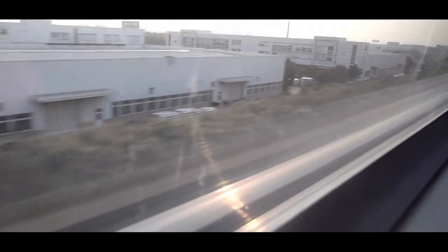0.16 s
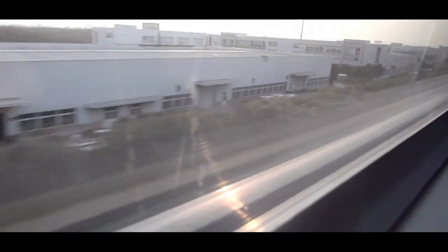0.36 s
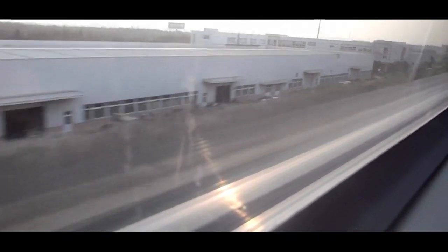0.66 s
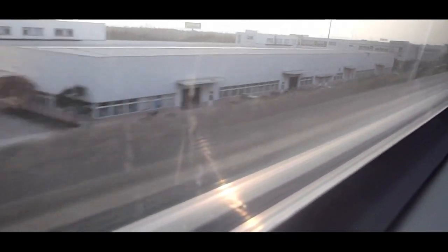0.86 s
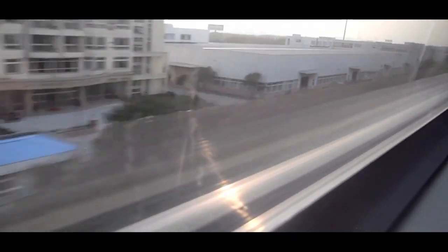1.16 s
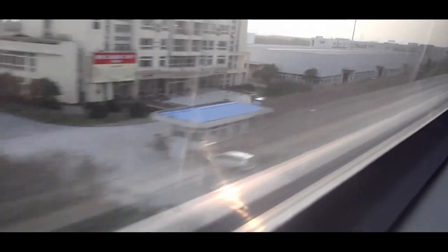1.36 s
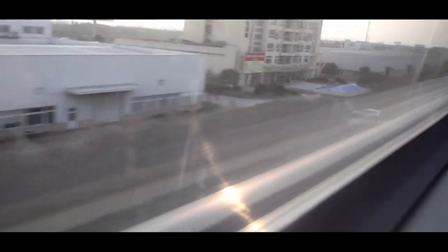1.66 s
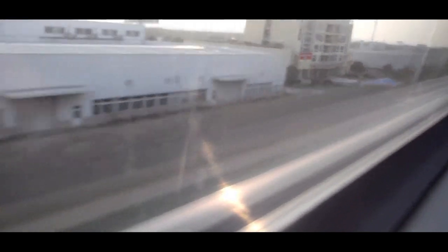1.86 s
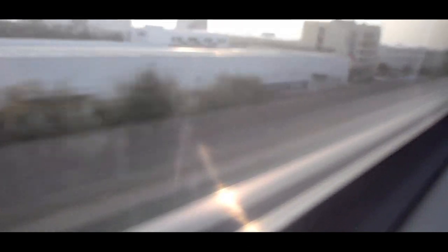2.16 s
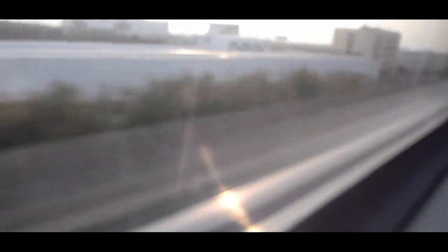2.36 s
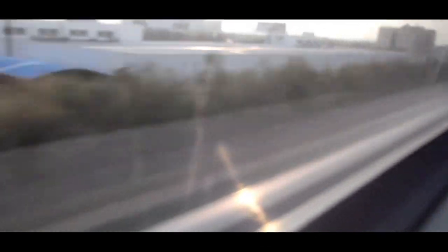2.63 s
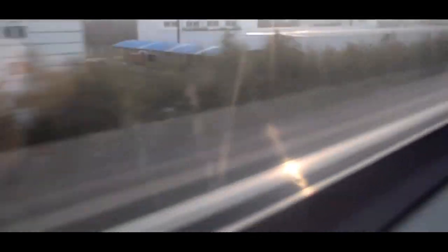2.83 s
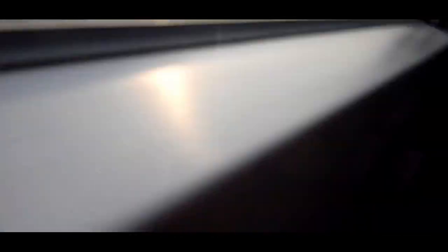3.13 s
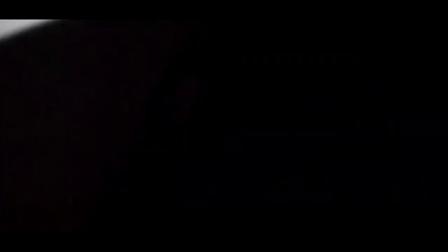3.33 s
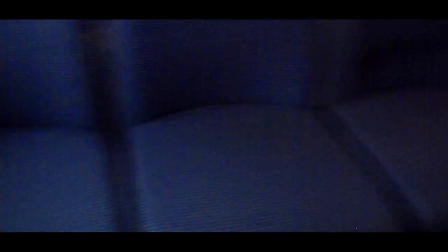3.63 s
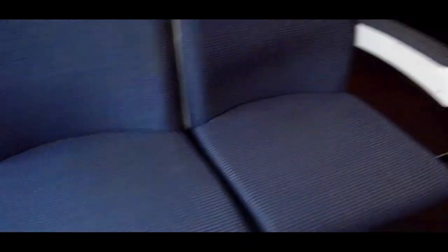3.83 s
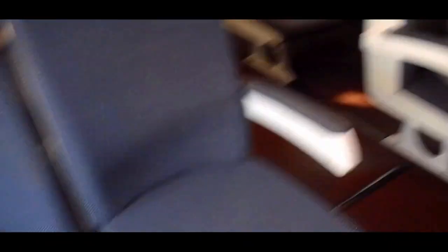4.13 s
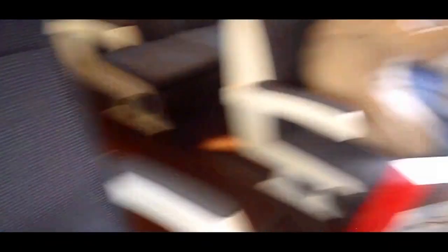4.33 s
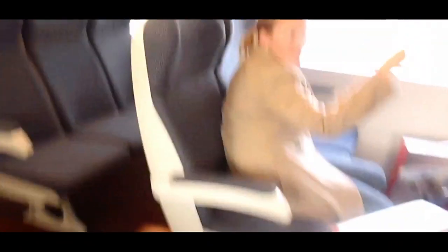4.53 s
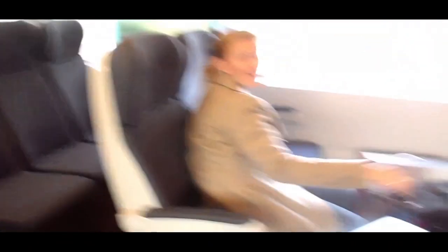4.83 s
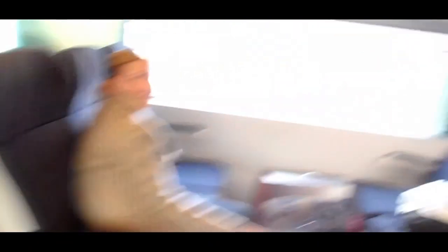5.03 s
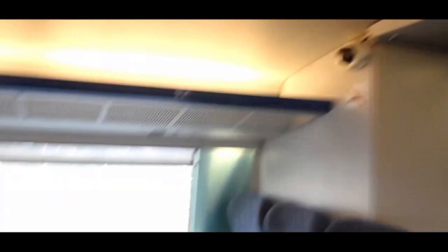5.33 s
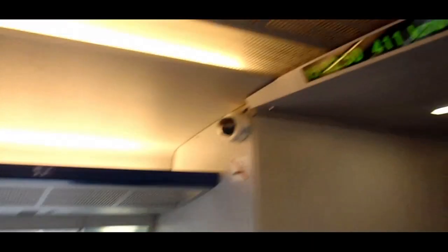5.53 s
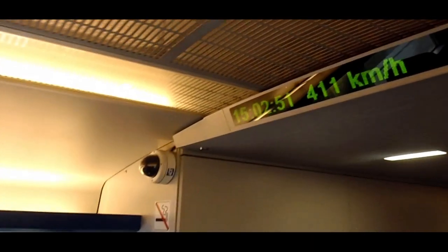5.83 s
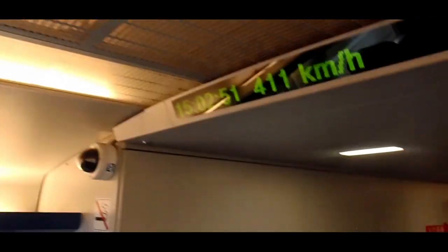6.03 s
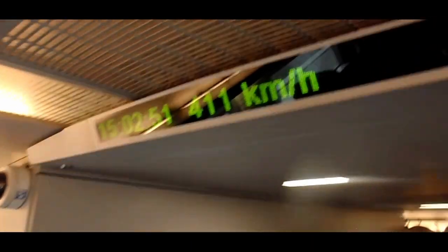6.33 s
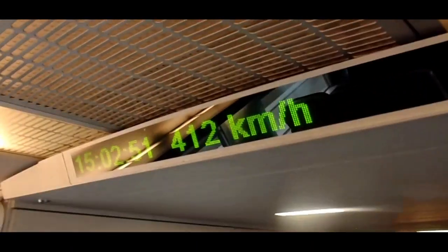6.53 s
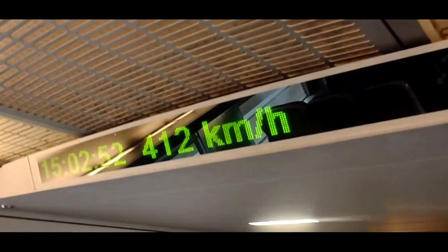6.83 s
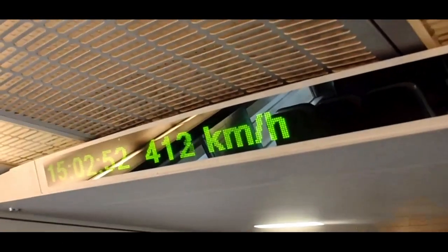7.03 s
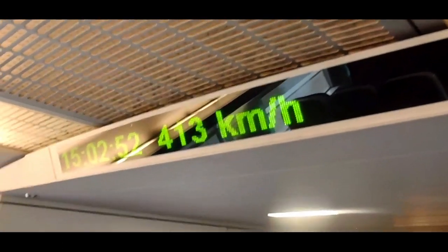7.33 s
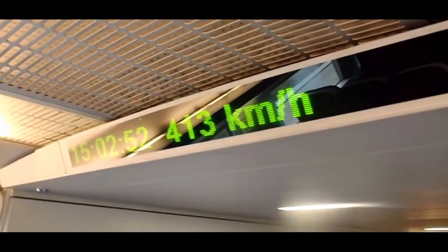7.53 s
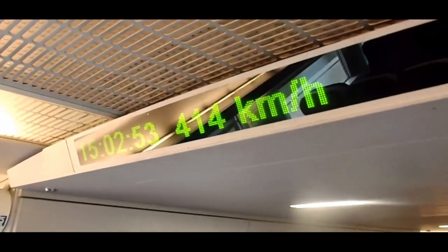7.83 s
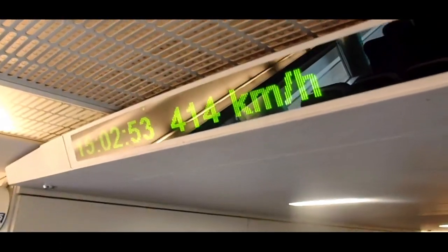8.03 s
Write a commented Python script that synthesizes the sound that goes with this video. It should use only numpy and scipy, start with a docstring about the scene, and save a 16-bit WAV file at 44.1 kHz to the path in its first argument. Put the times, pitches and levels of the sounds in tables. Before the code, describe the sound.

Steady deep rushing roar inside a very fast train cabin, with a rough high whine growing stronger and small plastic ticks of a handheld camera.

```python
"""Air rushing over a maglev train at full speed booms in the cabin and hisses through the panels.
A hand-held camera hears it, turning from the window to the aisle: shaped noise that shifts in colour.
The drive adds low hums and a whine that grows unevenly: wavering tones and a rough band of noise.
The camera's case rustles (grainy noise) and ticks (short rings and cracks) in the hand.
Thin whistles, nearly pure tones, come and go."""
import sys
import numpy as np
from scipy import signal
from scipy.fft import rfft, irfft
from scipy.io import wavfile
from scipy.ndimage import uniform_filter1d

SR = 44100
rng = np.random.default_rng(int(sys.argv[2]) if len(sys.argv) > 2 else 0)


def to_wav(s):
    """Save 16-bit WAV."""
    ch = np.atleast_2d(s).T  # columns
    pcm = np.round(np.clip(ch, -1, 1) * 32767)  # PCM
    wavfile.write(sys.argv[1], SR, pcm.astype(np.int16))


N = 360738
TIME = np.arange(N) / SR
FREQ = np.maximum(np.arange(N // 2 + 1) * SR / N, 1)  # never 0, so its logarithm exists

# where the microphone is: time_s, place (0 at the window, 1 over the seats, 2 in the aisle)
MIC_PLACE = [(0, 0), (3.1, 0), (3.9, 1), (5.4, 1), (6.1, 2), (8.18, 2)]
# level of the rush at the window, over the seats and in the aisle: level_db
PLACE_LEVELS = [-18, -18.5, -19]
# colour of the rumble at each place, relative: pitch_hz, window_db, seats_db, aisle_db
RUMBLE_COLOUR = [(15, -21, -14.5, -21.5), (33.8, -9.5, -10.5, -16.5), (56, 1.5, -1, -8), (91, -1.5, -2, 1),
                 (114.6, -1.5, -0.5, -4.5), (151, -10, -8.5, -7.5), (166, -3.5, -5.5, -10.5),
                 (226, -8.5, -9, -10.5), (257, -9.5, -7, -9), (332, -15, -13.5, -16.5),
                 (455, -19.5, -20, -22.5), (838, -32.5, -32, -33)]
# colour of the air noise above it, on the same scale: pitch_hz, window_db, seats_db, aisle_db
AIR_COLOUR = [(945, -33, -31.5, -32), (1380, -41.5, -36.5, -40), (1430, -43, -39.5, -39.5),
              (1940, -48, -42, -45), (2430, -50.5, -51.5, -53), (3130, -49.5, -46.5, -46.5),
              (3690, -49, -44.5, -44.5), (3985, -55.5, -51, -50.5), (5220, -74.5, -71, -69.5),
              (5440, -70, -64.5, -63.5), (6940, -79.5, -75.5, -79), (13400, -101, -99.5, -102)]
# boost or dip from panel and cabin resonances: pitch_hz, width_hz, window_db, seats_db, aisle_db
PANEL_RESONANCES = [(660, 48, 2, 2.5, 4.5), (1360, 36, -0.5, 1, 6.5), (2380, 320, -1.5, 5, 7.5),
                    (2746, 280, 8, 3.5, 2)]
# brief swells and lulls of the rush: middle_s, length_s, boom_change_db, roar_change_db, hiss_change_db
RUSH_SWELLS = [(1.118, .27, .5, 3, 3), (1.906, 0.18, 3, 1, 2), (2.382, .12, -2, 5, 3.5),
               (2.692, 0.22, 2.5, -0.5, 1.5), (2.862, .08, -0.5, -7.5, -2.5), (3.128, 0.18, 0.5, -11, -5.5),
               (3.33, 0.27, 2, -1, 0), (3.524, 0.2, -2.5, -5.5, -4.5), (3.851, 0.053, 7, 4, -0.5),
               (4.15, 0.21, 0.5, 0, -1), (4.52, .2, -2, 2.5, -0.5), (4.85, 0.084, -1.5, -2, -2.5),
               (5.266, 0.1, -1.5, -4.5, 0.5), (5.763, 0.38, 2.5, 4, 3.5), (5.964, 0.41, -2.5, -4, -3.5),
               (6.207, 0.14, -3.5, 4, 2), (6.401, .08, 2.5, 6.5, 4.5), (7.147, .3, 2, 0, 0),
               (7.485, 0.068, -1.5, -8.5, -4.5), (7.776, .2, 1.5, 1.5, 0), (7.993, 0.44, -2, 0, -1.5)]
# pitch of the drive's whine: time_s, pitch_hz
WHINE_PITCHES = [(0, 1067), (2.4, 1062), (3.1, 1064), (3.45, 1077), (4.1, 1082), (4.7, 1078), (5.65, 1092),
                 (6.5, 1084), (8.18, 1093)]
# levels of the drive's whine: time_s, clean_line_db, rough_band_db
WHINE_LEVELS = [(0, -51, -54), (.75, -50, -45), (1, -49, -49.5), (1.25, -45.5, -49), (1.75, -53.5, -58),
                (2.35, -49.5, -50), (2.85, -50.5, -59.5), (3.12, -56, -61), (3.44, -43.5, -49.5),
                (3.53, -64, -60), (3.64, -51, -36.5), (3.8, -54, -56), (4.07, -39.5, -40.5),
                (4.35, -48.5, -47), (4.6, -44, -43.5), (5.2, -51.5, -44.5), (5.6, -45.5, -43.5),
                (5.85, -39.5, -37.5), (6, -43, -38.5), (6.45, -36, -36.5), (7.33, -39.5, -36),
                (7.5, -41, -41), (7.7, -40, -36), (8.18, -38.5, -39.5)]
# shape of the rough band around the whine's pitch: offset_from_pitch_hz, relative_level_db
ROUGH_BAND = [(-29.5, -40), (-15, -13.5), (2.5, -5.5), (13.5, -1), (26, 0), (47, -8.5), (67.5, -21.5),
              (121, -17), (220, -43.5)]
# low hums inside the rumble: pitch_hz, level_db
LOW_HUMS = [(32, -45.5), (110, -31.5)]
# fingers sliding on the case: middle_s, length_s, level_db
FINGER_RUBS = [(.172, .02, -69), (2.425, .05, -70.5), (2.59, .015, -67), (2.71, .04, -72),
               (3.005, .05, -67), (3.315, .015, -69), (3.66, .05, -66), (3.994, 0.54, -76.5),
               (4.255, 0.029, -69), (4.352, .04, -60), (4.677, .06, -68), (5.2, .02, -65),
               (5.33, 0.11, -71), (5.552, .47, -76), (5.447, 0.026, -62), (5.538, 0.033, -64),
               (6.21, .025, -69)]
# colour of a scuff: pitch_hz, relative_level_db
SCUFF_COLOUR = [(1000, -9.5), (3500, 2), (5500, 2.5), (7300, -3), (8700, -13), (11300, -11), (14500, -22.5)]
# ticks of the case: start_s, knock_db, clack_db, snap_db, crack_db, spot_ring_hz, spot_ring_db
CASE_TICKS = [(.1851, -52, -54, -62, -69, 5500, -70), (2.4425, -42, -51, -54, -66, 3500, -59),
              (2.4462, -31.5, -35.5, -44, -55, 2350, -45), (2.5025, -47, -54, -58, -65, 4000, -62),
              (2.6535, -39, -39, -40.5, -48, 1600, -35.5), (2.813, -29.5, -37, -44, -59, 1400, -40),
              (2.8311, -35, -40, -44, -54.5, 1750, -48), (2.9832, -29.5, -37, -34.5, -41, 4950, -41),
              (3.4973, -34, -37.5, -43, -50, 3750, -47), (3.654, -37.5, -49, -37, -55, 5400, -49),
              (3.6594, -49, -37, -47, -46, 2750, -41), (3.8655, -51, -52, -61, -65, 6500, -68),
              (4.241, -34, -49, -56, -58, 5600, -57), (4.2552, -30, -38, -49, -53.5, 3550, -53),
              (4.305, -50, -56, -64, -66, 9500, -74), (4.3092, -52, -57, -63, -63, 9500, -75),
              (4.5642, -37.5, -37, -51, -62, 1800, -41), (5.3708, -52, -51, -58, -66, 4900, -62),
              (5.4424, -38, -43, -47, -55, 3600, -52), (5.8394, -33.5, -25, -37.5, -45.5, 5750, -50),
              (6.2065, -45, -54, -62, -67, 6500, -71), (6.5588, -50, -46.5, -62, -64, 5500, -68)]
# what the case rings with, relative: pitch_hz, level_db, time_to_fall_60_db_s
CASE_RINGS = [(690, 18.5, 0.016), (900, -3, 0.044), (1170, -5.5, 0.015), (1510, -2, 0.018),
              (2150, 5, 0.0064), (2780, -3.5, 0.017), (3500, 3.5, 0.011), (4050, -2.5, 0.02),
              (4640, -3.5, 0.009), (5500, -2.5, 0.0076), (5830, -6, 0.007), (7340, -5, 0.0088)]
# parts of a tick: knock, clack, snap, crack and the fizz above: lower_edge_hz, upper_edge_hz
TICK_REGISTERS = [(550, 710), (1000, 2300), (2300, 4100), (4200, 5500), (6500, 10000)]
# thin whistles that come and go; those near 1330 Hz are a faint second line of the drive: middle_s, length_s,
# pitch_hz, level_db
THIN_WHISTLES = [(3.47, .35, 1324, -58), (4.8, .9, 1328, -58), (5.7, .3, 1332, -51.5),
                 (7.0, 1.2, 3596, -70), (7.46, .2, 4102, -64)]

BOOM_TOP_HZ, ROAR_TOP_HZ = 219, 1200  # where the boom gives way to the roar, and the roar to the hiss
TOP_HZ = 15700  # highest pitch let through at the end


def undb(db):
    """Turn decibels into gain."""
    return 10 ** (np.asarray(db) / 20)


def unit(x):
    """Scale to rms 1."""
    return x / np.sqrt(np.mean(x ** 2))


def curves(table):
    """Join each column of a table by straight lines in time."""
    times, *columns = np.transpose(table)
    return [np.interp(TIME, times, column) for column in columns]


def shaped_noise(gain):
    """Make random noise with the given gain at every frequency."""
    return irfft(rfft(rng.standard_normal(N)) * gain, N)


def walk(rate):
    """Wander smoothly by chance, with spread 1, changing about rate times a second."""
    return unit(shaped_noise(np.exp(-(FREQ / rate) ** 2)))


def colour(points):
    """Turn points of pitch and decibels into a gain at every frequency."""
    hz, db = np.transpose(points)
    return undb(np.interp(np.log(FREQ), np.log(hz), db))


def hump(middle, length):
    """Rise and fall smoothly around a moment, 1 at the top; length is the width at 37 % height."""
    return np.exp(-(2 * (TIME - middle) / length) ** 2)


def steady(x):
    """Hold a beating tone at about rms 1 over every quarter second."""
    return x / np.sqrt(uniform_filter1d(x ** 2, size=SR // 4))


def cabin_noise(index):
    """Turbulent air is noise, coloured by the cabin and its panels at one place; rms 1."""
    gain = colour([(row[0], row[1 + index]) for row in RUMBLE_COLOUR + AIR_COLOUR])
    for hz, width, *db in PANEL_RESONANCES:
        resonance_db = db[index] / (1 + (2 * (FREQ - hz) / width) ** 2)
        gain = gain * undb(resonance_db)
    return unit(shaped_noise(gain))


def swells():
    """The boom, the roar and the hiss each swell or sink at times; changes in dB."""
    return sum(np.outer(db, hump(middle, length)) for middle, length, *db in RUSH_SWELLS)


def rush(buffet_db=0.88, flicker_db=1.2, surge_db=0.18):
    """Rushing air changes colour with place; eddies shake all of it together and each register alone."""
    place, = curves(MIC_PLACE)
    air = 0
    for index in range(3):
        share = np.clip(1 - abs(place - index), 0, 1)
        # square roots keep the power even while two places blend
        air = air + np.sqrt(share) * undb(PLACE_LEVELS[index]) * cabin_noise(index)
    spectrum = rfft(air)

    below_roar = 1 / (1 + (FREQ / BOOM_TOP_HZ) ** 4)
    below_hiss = 1 / (1 + (FREQ / ROAR_TOP_HZ) ** 4)
    boom_roar_hiss = below_roar, below_hiss - below_roar, 1 - below_hiss
    shared_eddies_db = buffet_db * walk(16) + surge_db * walk(2.3)
    out = 0
    for register, swell_db in zip(boom_roar_hiss, swells()):
        change_db = swell_db + shared_eddies_db + flicker_db * walk(35)
        out = out + irfft(spectrum * register, N) * undb(change_db)
    return out


def whine(wander_hz=2.5, flutter_db=4.0):
    """The drive's wavering line beats against a rough band of near tones, strongest just above it."""
    line_db, band_db = curves(WHINE_LEVELS)
    pitch_hz, = curves(WHINE_PITCHES)
    carrier = np.exp(2j * np.pi * np.cumsum(pitch_hz + wander_hz * walk(14.1)) / SR)
    line = steady(carrier.imag * undb(flutter_db * walk(25)))

    offset_hz, offset_db = np.transpose(ROUGH_BAND)
    gain = np.interp(np.fft.fftfreq(N, 1 / SR), offset_hz, undb(offset_db), left=0, right=0)
    roughness = np.fft.ifft(np.fft.fft(rng.standard_normal(N)) * gain)
    band = steady(np.real(carrier * roughness))  # rides on the line's pitch
    return undb(line_db) * line + undb(band_db) * band


def hum(wander_hz=1.3, flutter_db=3):
    """The drive's low hums are sine waves that waver in pitch and level inside the rumble."""
    out = 0
    for hz, level_db in LOW_HUMS:
        phase = 2 * np.pi * np.cumsum(hz + wander_hz * walk(6.2)) / SR
        out = out + undb(level_db) * unit(np.sin(phase) * undb(flutter_db * walk(3.2)))
    return out


def rubs(grains_per_s=700, grain_spread_db=3.5, smooth_db=-8):
    """Skin sticks and slips on the case: scuffs of uneven grains over a little smooth friction."""
    slips = rng.random(N) < grains_per_s / SR
    sizes_db = grain_spread_db * np.clip(rng.standard_normal(N), -2, 2)
    grains = slips * rng.choice([-1, 1], N) * undb(sizes_db)
    friction = unit(grains) + undb(smooth_db) * rng.standard_normal(N)
    slides = sum(undb(db) * hump(middle, length) for middle, length, db in FINGER_RUBS)
    return slides * unit(irfft(rfft(friction) * colour(SCUFF_COLOUR), N))


def ticks(bare_db=7.5, fizz_db=-14.5, slip_s=0.0017, contact_s=0.0002, detune_share=0.033, spot_t60_s=0.02):
    """A slip of the plastic case cracks and rings it; grip tilts the colour, and the spot rings too."""
    out = np.zeros(N + SR)
    t = TIME[:SR // 12]
    lead = SR // 100  # 10 ms of room before each tick; levels are power averaged over this length
    size = len(t) + lead
    hz, db, t60 = np.transpose(CASE_RINGS)[:, :, None]
    bins = np.maximum(np.fft.rfftfreq(size, 1 / SR), 1)
    passband = 1 / (1 + (480 / bins) ** 4) / (1 + (bins / 9000) ** 3)
    contact = 1 - np.exp(-t / contact_s)  # softens the onset
    register_middles = np.log(TICK_REGISTERS).mean(axis=1)

    for start_s, *levels, spot_hz, spot_db in CASE_TICKS:
        detune, strength, phase = rng.standard_normal((3, len(CASE_RINGS), 1))
        tones = np.sin(2 * np.pi * (hz * (1 + detune_share * detune) * t + phase))
        ring = np.sum(undb(db + 2 * strength) * tones * 1000 ** (-t / t60), axis=0)
        crack = undb(bare_db) * rng.standard_normal(len(t)) * np.exp(-t / slip_s)
        blow = rfft(np.pad((ring + crack) * contact, (lead, 0))) * passband

        # bring each register from its own level to the wanted one
        own_db = []
        for low, high in TICK_REGISTERS:
            energy = np.sum(abs(blow[(bins > low) & (bins < high)]) ** 2)
            own_db.append(10 * np.log10(2 * energy / (size * lead)))
        wanted_db = np.array(levels + [levels[-1] + fizz_db])
        grip_db = np.interp(np.log(bins), register_middles, wanted_db - own_db)

        spot = np.sin(2 * np.pi * spot_hz * t) * contact * 1000 ** (-t / spot_t60_s)
        spot = np.pad(spot, (lead, 0))
        spot = undb(spot_db) * spot / np.sqrt(np.sum(spot ** 2) / lead)
        start = int(start_s * SR) - lead
        out[start:start + size] += irfft(blow * undb(grip_db), size) + spot
    return out[:N]


def whistles():
    """Faint sine whistles, wavering slightly together, rise out of the rush and sink back."""
    cycles = np.cumsum(1 + .001 * walk(15)) / SR  # pitch wavers by about 0.1 %
    flutter = unit(undb(2 * walk(12)))
    out = 0
    for middle, length, hz, level_db in THIN_WHISTLES:
        tone = unit(np.sin(2 * np.pi * hz * cycles))
        out = out + undb(level_db) * hump(middle, length) * tone
    return flutter * out


def scene():
    """Add the rush, the drive and the whistles to the handling close by, in one channel."""
    return (rush() + whine() + hum() + rubs() + ticks() + whistles())[None]


def record(dry):
    """The camera rounds the highest peaks and cuts the top of the treble."""
    rounded = dry / (1 + (dry / .47) ** 8) ** (1 / 8)  # never goes beyond .47
    low_pass = signal.ellip(8, .2, 70, TOP_HZ, fs=SR, output="sos")
    return signal.sosfilt(low_pass, rounded)


dry = scene()
out = record(dry)
to_wav(out)
```